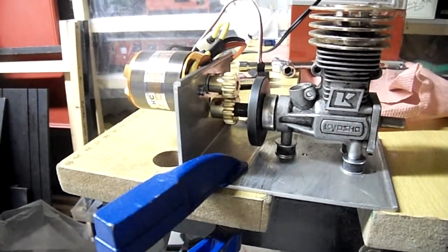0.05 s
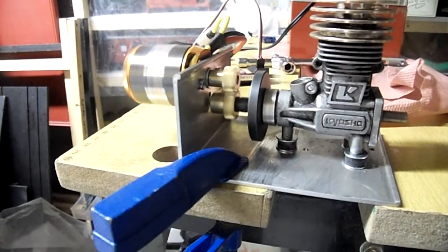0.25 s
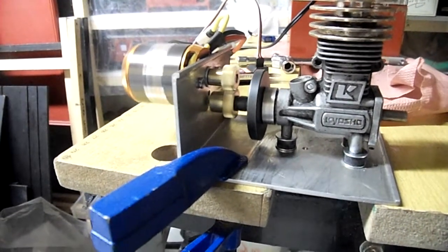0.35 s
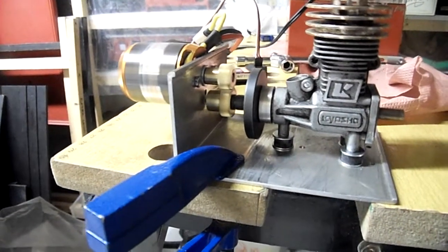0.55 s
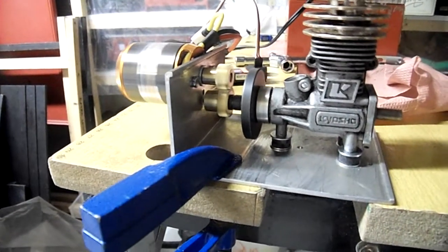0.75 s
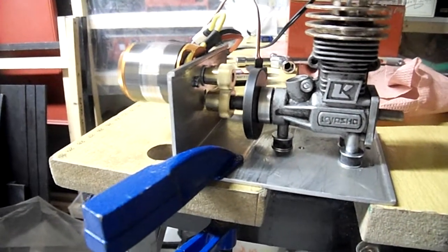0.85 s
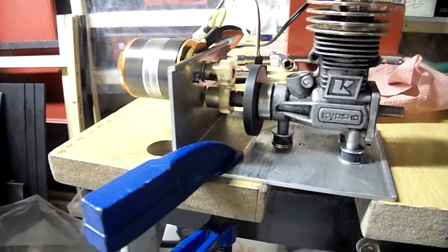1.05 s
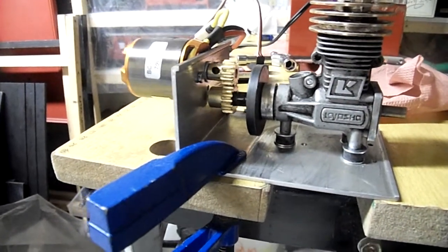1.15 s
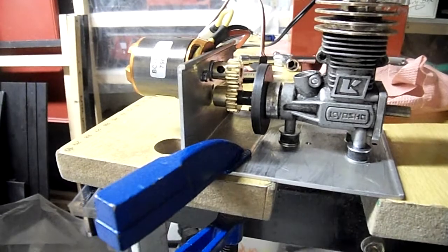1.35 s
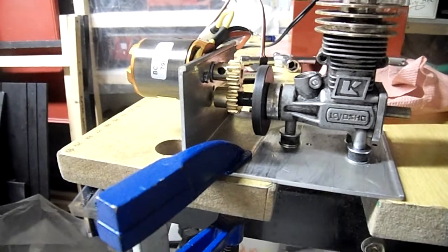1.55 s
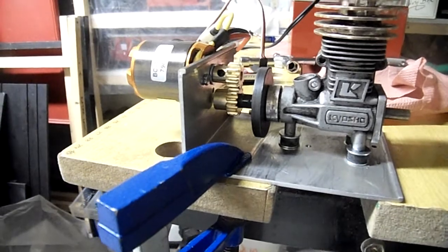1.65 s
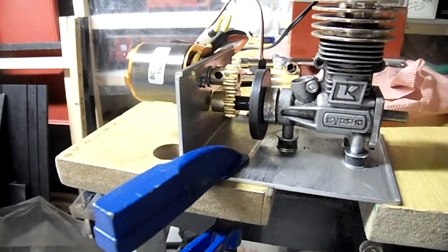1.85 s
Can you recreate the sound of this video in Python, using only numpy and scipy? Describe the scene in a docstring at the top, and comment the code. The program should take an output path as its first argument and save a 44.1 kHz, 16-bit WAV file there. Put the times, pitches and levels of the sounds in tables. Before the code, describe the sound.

Plastic gears clatter close by on a workbench as an electric motor cranks a small engine. A thin high whine and stuttering clicks come first. From 0.2 seconds a harsh whir rises, pulsing with rapid puffs, the engine never firing. It peaks from 0.5 to 0.8 seconds, then falls away, ending in ticks and a faint metallic ring around 1.2. Quiet room follows, with faint knocks after 1.6.

```python
"""Plastic gears clatter on a metal plate as an electric motor cranks a small single-cylinder engine,
close by on a workbench. The motor whines and stutters, catches, spins up and runs down.
The engine never fires: it puffs once a turn, and its compression makes the clatter surge.
The last teeth tick home and the metal rings on in a quiet room."""
import sys
import numpy as np
from scipy import signal
from scipy.fft import rfft, irfft
from scipy.io import wavfile
from scipy.ndimage import uniform_filter1d

SR = 44100
rng = np.random.default_rng(int(sys.argv[2]) if len(sys.argv) > 2 else 0)


def int16_out(signal):
    """Quantize to a 16-bit WAV file."""
    q = np.round(np.clip(np.atleast_2d(signal).T, -1, 1) * 32767)
    wavfile.write(sys.argv[1], SR, q.astype(np.int16))


N = 83790
TIME = np.arange(N) / SR
HZ = np.maximum(np.fft.rfftfreq(2 * N, 1 / SR), 1)

# Room tone colour. Each row: frequency in Hz, relative level in dB.
AIR_COLOUR = [(15, -23.5), (25, 2.5), (93, -7.5), (176, -9), (272, -17), (478, -12), (1270, -15),
              (1370, -15.5), (9130, -22.5), (11500, -30), (15000, -57), (22000, -120)]
# Room tone width. Each row: frequency in Hz, left-right correlation.
AIR_LIKENESS = [(50, 0.96), (500, 0.95), (2000, .2), (8000, .1)]
# Faint knocks on the bench. Each row: start in seconds, level in dB.
KNOCKS = [(1.642, -50.5), (1.752, -61), (1.876, -60), (1.888, -53.5)]
# Bench resonances. Each row: pitch in Hz, gain in dB, 60 dB decay time in seconds.
BENCH_MODES = [(440.7, -0.5, 0.014), (686, -0.5, .012), (1600, -7.5, .008)]
# Envelope of the drive's whine. Each row: time in seconds, level in dB.
WHINE_LEVEL = [(0, -42), (.03, -39.5), (.09, -37), (.15, -43.5), (.185, -32), (.24, -38), (.36, -34),
               (.5, -38), (.9, -52.5), (1.0, -100)]
# Crankshaft speed. Each row: time in seconds, turns per second.
SHAFT_SPEED = [(0.16, 0.0), (0.22, 15.65), (0.28, 23.87), (0.35, 37.9), (0.41, 58.22), (0.47, 75.4),
               (0.53, 88.72), (0.6, 92.53), (0.68, 94.17), (0.77, 94.28), (0.81, 90.88), (0.87, 71.4),
               (0.93, 47.42), (0.98, 27.48), (1.06, 7.09), (1.22, 0.0)]
# Shaft tones. Each entry: pitch as a multiple of the shaft speed.
SHAFT_ORDERS = [1, 2, 5, 7, 8, 9, 11, 13, 15, 24, 29]
# Balance of those tones. Each entry: level in dB at top speed.
SHAFT_DB = [-41, -42.5, -35, -34.5, -22, -37, -36, -33.5, -27, -35.5, -30.5]
# Cylinder and port resonances. Each row: centre in Hz, width in Hz, gain in dB.
PORTS = [(190, 34, -16), (290, 90, -22.5), (450, 330, -5), (648, 260, 1), (1000, 400, -12.5)]
# Colour of the motor, wheels and mount. Each row: frequency in Hz, relative level in dB.
GEAR_COLOUR = [(20, -54.5), (110, -29), (250, -22), (500, -6.5), (900, -0.5), (1350, 1.5), (1850, -2),
               (2150, 4.5), (2750, -0.5), (3100, -3), (3700, -6), (4600, -6.5), (5600, -2.5), (6400, -3),
               (7300, -6.5), (8600, -3.5), (9500, -2), (10400, -2.5), (10700, -11), (11700, -24)]
# Stereo width of the gears. Each row: frequency in Hz, left-right correlation.
GEAR_LIKENESS = [(200, 1), (800, -0.16), (1500, 0.71), (2300, 0.27), (3200, 0.15), (4600, -0.045),
                 (6300, .45), (8200, .45), (9300, -0.066), (10400, .45)]
# How hard the teeth strike. Each row: time in seconds, relative level in dB.
TOOTH_LOAD = [(0, -79), (.016, -85), (.024, -45.5), (.092, -30), (.104, -38), (.156, -55), (.168, -40),
              (.2, -30), (.228, -20.5), (.3, -18), (.42, -13.5), (.6, -12.5), (.79, -12.5), (.968, -17.5),
              (.98, -19), (1.012, -19.5), (1.066, -37), (1.088, -36.5), (1.12, -48), (1.2, -51.5),
              (1.25, -84), (1.3, -100)]
# The motor jerks against the gears before it catches. Each row: start in seconds, relative level in dB.
JERKS = [(.018, -28), (.0215, -34), (.032, -22), (.041, -21), (.048, -36.5), (.053, -25), (.058, -17),
         (.065, -45), (.071, -17), (.0945, -24.5), (.164, -24.5), (.172, -23), (.181, -16.5), (.187, -16)]
# The last teeth tick home. Each row: start in seconds, relative level in dB.
TICKS = [(1.083, -39), (1.089, -25), (1.105, -35), (1.126, -41), (1.142, -34.5), (1.158, -38.5),
         (1.164, -41), (1.174, -49), (1.189, -40), (1.2125, -40.5)]
# Ring of the metal. Each row: pitch in Hz, gain in dB, 60 dB decay time in seconds, right-side polarity.
METAL_MODES = [(2390, -72, 0.53, 1), (2337, -62, 0.56, 1), (2520, -69, 0.71, 1), (4740, -65, .6, -1),
               (2230, -43.5, .04, 1), (2040, -51, 0.046, 1), (2560, -50, .07, 1), (10400, -54.5, 0.05, 1)]

WHINE_HZ, STATOR_HZ = 7766, 3230
PUFF_AT, SURGE_AT = .49, .36  # fractions of a turn
TEETH, RATTLES_PER_S = 29, 3000


def from_db(db):
    """Decibels to gain."""
    return 10 ** (np.asarray(db) / 20)


def rms_one(x):
    """Scale to unit rms."""
    return x / np.sqrt(np.mean(x ** 2) + 1e-20)


def in_time(rows):
    """A breakpoint envelope at every sample."""
    return np.interp(TIME, *np.transpose(rows))


def at_hz(points):
    """A breakpoint spectrum at every frequency."""
    hz, value = np.transpose(points)
    return np.interp(np.log(HZ), np.log(hz), value)


def filtered(x, kind, hz, order=2):
    """A gentle low-pass or high-pass."""
    return signal.sosfilt(signal.butter(order, hz, kind, fs=SR, output="sos"), x)


def drift(rate_hz):
    """Smooth random modulation at unit rms."""
    return rms_one(filtered(rng.standard_normal(2 * N), "low", rate_hz)[N:])


def clicks(times, sizes):
    """A train of one-sample clicks."""
    return np.bincount((np.asarray(times) * SR).astype(int), sizes, N)[:N] + 1e-18


def blows(rows):
    """Clicks from rows of start in seconds and level in dB."""
    times, db = np.transpose(rows)
    return clicks(times, from_db(db))


def ring(x, hz, t60):
    """Each click sets a decaying sine ringing."""
    r, w = from_db(-60 / (t60 * SR)), 2 * np.pi * hz / SR
    return signal.lfilter([0, np.sin(w)], [1, -2 * r * np.cos(w), r * r], x)


def resonance(x, hz, width_hz):
    """Band-pass with unity gain at the peak."""
    r, w = np.exp(-np.pi * width_hz / SR), 2 * np.pi * hz / SR
    return signal.lfilter(np.array([1, 0, -1]) * (1 - r * r) / 2, [1, -2 * r * np.cos(w), r * r], x)


def noise_bursts(triggers, hz, width_hz, t60):
    """Each click opens a decaying burst of band-passed noise."""
    envelope = signal.lfilter([1], [1, -from_db(-60 / (t60 * SR))], triggers)
    band = resonance(rng.standard_normal(N), hz, width_hz)
    return envelope * rms_one(resonance(band, hz, 2 * width_hz))


def stereo(spectra, colour, likeness):
    """Two unrelated spectra, as mid and side, become a coloured left and right."""
    alike = np.clip(at_hz(likeness), -1, 1)
    mid = np.sqrt(1 + alike) * spectra[0]
    side = np.sqrt(1 - alike) * spectra[1]
    return irfft(np.array([mid + side, mid - side]) * from_db(at_hz(colour)))[:, :N]


def levelled(force):
    """Ride the gain to hold the short-term rms steady."""
    return force / np.sqrt(uniform_filter1d(force ** 2, size=700) + 1e-4)


def workshop():
    """A bed of quiet room air with a few faint knocks on the bench."""
    air = rms_one(stereo(rfft(rng.standard_normal((2, 2 * N))), AIR_COLOUR, AIR_LIKENESS))
    knocks = sum(from_db(db) * ring(blows(KNOCKS), hz, t60) for hz, db, t60 in BENCH_MODES)
    return from_db(-63) * air + knocks


def motor_whine(flutter_depth=.39, flutter_hz=75):
    """The drive's switching tone, fluttering as the coils change over, with a weaker stator ring."""
    def tone(hz):
        flutter = 1 + flutter_depth * (drift(flutter_hz) + 1j * drift(flutter_hz))
        return np.real(flutter * np.exp(2j * np.pi * hz * TIME))
    return from_db(in_time(WHINE_LEVEL)) * rms_one(tone(WHINE_HZ) + from_db(-17.5) * tone(STATOR_HZ))


def shaft_tones(speed, turns, waver=.2):
    """Wavering tones that glide with the shaft and stand out at full speed."""
    tones = 0
    for order, db in zip(SHAFT_ORDERS, SHAFT_DB):
        level = from_db(db) * (1 + waver * drift(34))
        phase = 2 * np.pi * order * (turns - .5) + waver * drift(30)
        tones -= level * np.cos(phase)
    return np.sqrt(2) * tones * (speed / speed.max()) ** 3


def chuffs(strokes, pace, fade_speed=43):
    """Air leaks briefly at each stroke, less at high speed."""
    leaks = clicks(strokes, np.exp(-(pace / fade_speed) ** 2))
    return from_db(-22) * noise_bursts(leaks, hz=470, width_hz=220, t60=.022)


def thumps(strokes, pace, stall_speed=27):
    """Slow strokes barely get over compression and shake the plate with a dull thump."""
    shoves = clicks(strokes, np.exp(-(pace / stall_speed) ** 4))
    plate = noise_bursts(shoves, hz=381, width_hz=520, t60=.037)
    return from_db(-24) * filtered(plate, "high", 140)


def engine(speed, turns, knee_speed=42, left_lag_s=.00018):
    """Once a turn a gulp of air sounds the cylinder and ports, stronger with speed."""
    strokes = np.interp(np.arange(int(turns[-1])) + PUFF_AT, turns, TIME)
    pace = np.interp(strokes, TIME, speed)  # turns per second at each stroke
    strength = np.tanh((pace / knee_speed) ** 2.4)
    gulps = filtered(clicks(strokes, -strength), "low", 1420)
    gulps = filtered(gulps, "high", 200, order=1)
    puffs = sum(from_db(db) * resonance(gulps, hz, width) for hz, width, db in PORTS)
    out = from_db(22.5) * puffs + chuffs(strokes, pace) + thumps(strokes, pace)
    return np.array([np.interp(TIME - left_lag_s, TIME, out), out])


def metal_ring(wheel):
    """The wheel excites the metal, and the final tick leaves it ringing."""
    last_strike = from_db(44) * blows(TICKS[-1:])
    return sum(from_db(db) * ring(wheel + t60 * last_strike, hz, t60) * np.array([[1], [polarity]])
               for hz, db, t60, polarity in METAL_MODES)


def gear_body(force, body_t60=.0099, room_t60=.059, room_db=-7):
    """Tooth blows sound a dense, tight ring with a short room tail; each call has its own grain."""
    noise = rng.standard_normal((2, 2, N))
    body = rms_one(noise[0] * from_db(-60 * TIME / body_t60))
    room = rms_one(noise[1] * from_db(-60 * TIME / room_t60))
    spectra = rfft(body + from_db(room_db) * room, 2 * N)
    flat = spectra / np.sqrt(uniform_filter1d(np.abs(spectra) ** 2, size=1200))
    response = stereo(flat, GEAR_COLOUR, GEAR_LIKENESS)[:, :N // 4]
    response = rms_one(response) / np.sqrt(N // 2 / 2)  # unit energy
    return signal.fftconvolve(force[None], response, axes=1)[:, :N]


def rattle(spread_db=4):
    """Loose teeth bounce at random in their play."""
    sizes = rng.choice([-1, 1], N) * from_db(spread_db * np.minimum(rng.exponential(1, N), 3))
    bounces = rng.random(N) < RATTLES_PER_S / SR
    return .65 * levelled(bounces * sizes)


def mesh(speed, turns, wear_db=3.5, scatter_db=2, knee_speed=58):
    """Each tooth strikes in turn, a little off the beat, worn ones harder."""
    tooth = np.arange(1, int(turns[-1] * TEETH))
    wear = rng.standard_normal(TEETH)
    jitter, scatter = rng.standard_normal((len(tooth), 2)).T
    times = np.interp((tooth + .11 * jitter) / TEETH, turns, TIME)
    sizes = from_db(wear_db * wear[tooth % TEETH] + scatter_db * scatter)
    return .69 * levelled(clicks(times, sizes)) * np.tanh(speed / knee_speed)


def gears(speed, turns, surge_db=3.3, pan_db=.53):
    """Mesh, pinion and wheel clatter, loaded by compression before each puff; metal and stator ring."""
    swell_db = surge_db * np.cos(2 * np.pi * (turns - SURGE_AT)) * np.tanh(turns)
    load = from_db(1.5 + in_time(TOOTH_LOAD) + swell_db)
    pinion = load * rattle() + from_db(8) * blows(JERKS)
    wheel = load * rattle() + from_db(14.5) * blows(TICKS)
    clatter = sum(gear_body(force) for force in (load * mesh(speed, turns), pinion, wheel))
    stator = from_db(-5.5) * ring(blows(JERKS), STATOR_HZ, t60=.011)
    out = filtered(clatter + metal_ring(wheel) + stator, "high", 170)
    return out * from_db([[-pan_db], [pan_db]])


def scene():
    """One shaft speed drives gears, engine and tones, over the whine and the room."""
    speed = in_time(SHAFT_SPEED)
    turns = np.cumsum(speed) / SR
    machine = gears(speed, turns) + engine(speed, turns) + shaft_tones(speed, turns)
    return machine + motor_whine() + workshop()


def record(dry, ceiling=.88, cutoff_hz=11900):
    """Clip the highest peaks, then cut the top end steeply."""
    clipped = np.clip(dry, -ceiling, ceiling)
    return signal.sosfilt(signal.ellip(10, .2, 70, cutoff_hz, fs=SR, output="sos"), clipped)


dry = scene()
out = record(dry)
int16_out(out)
```